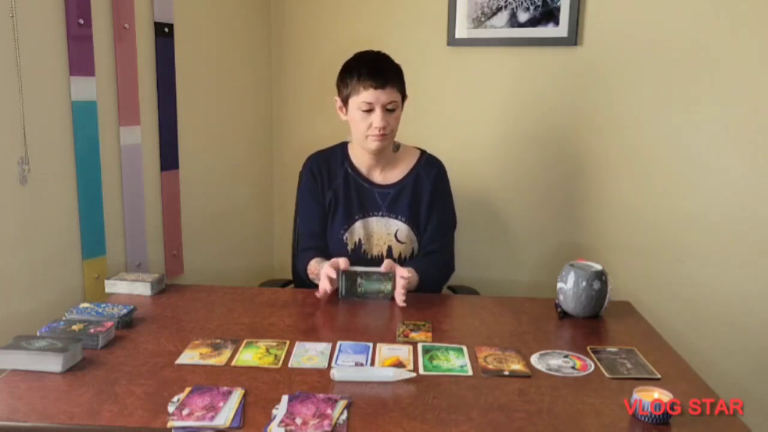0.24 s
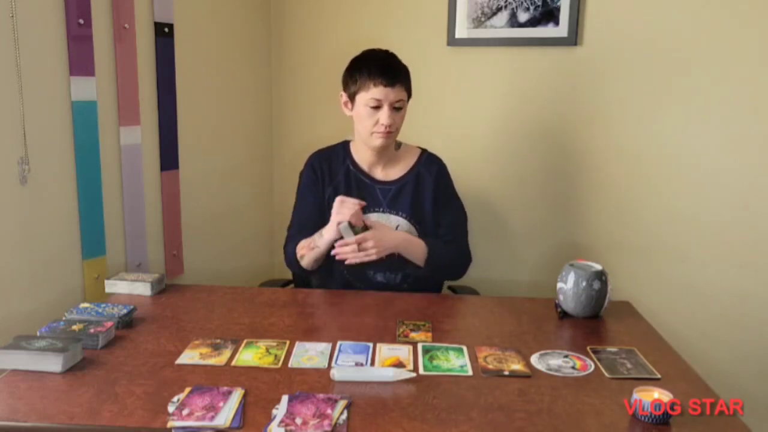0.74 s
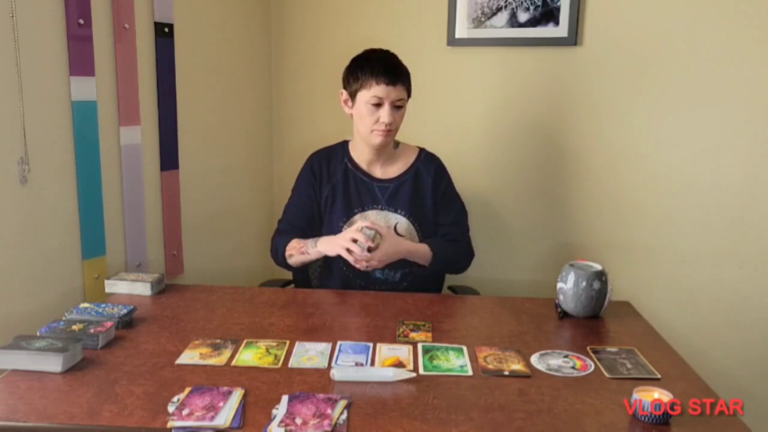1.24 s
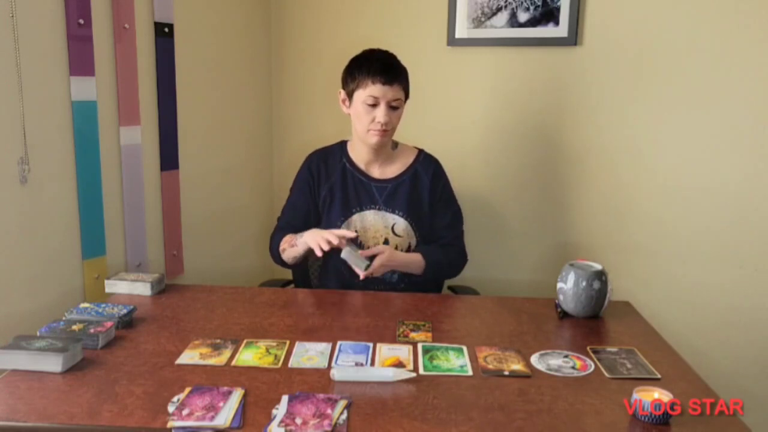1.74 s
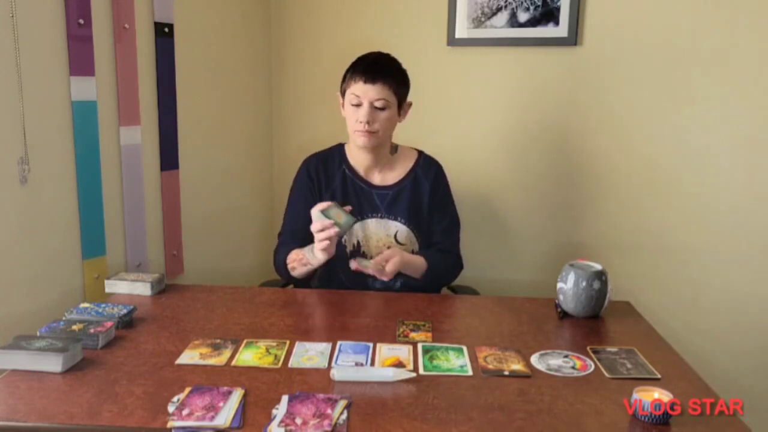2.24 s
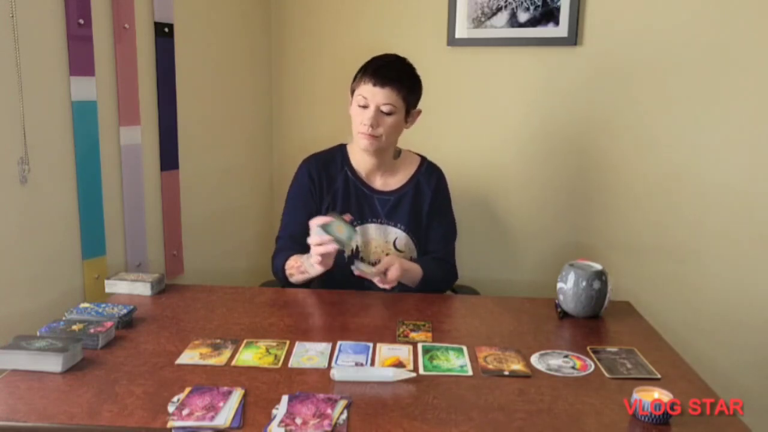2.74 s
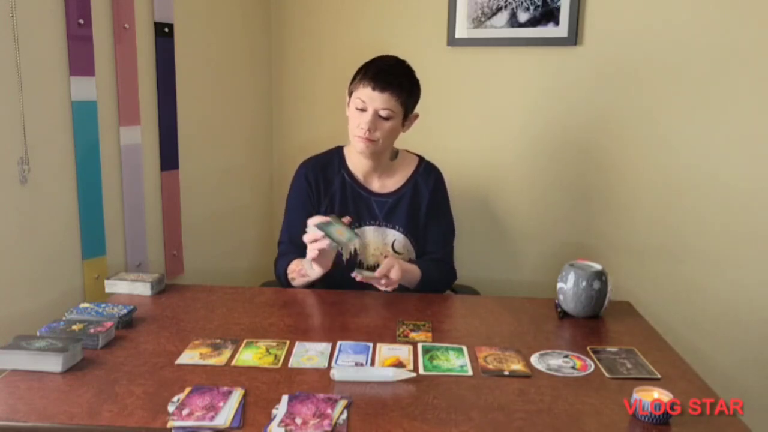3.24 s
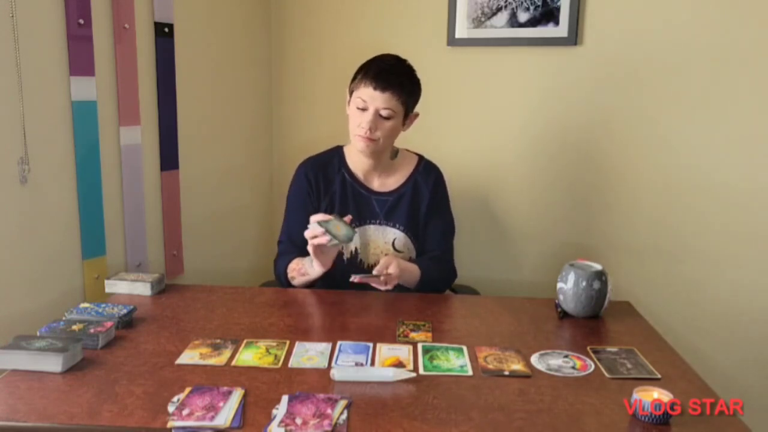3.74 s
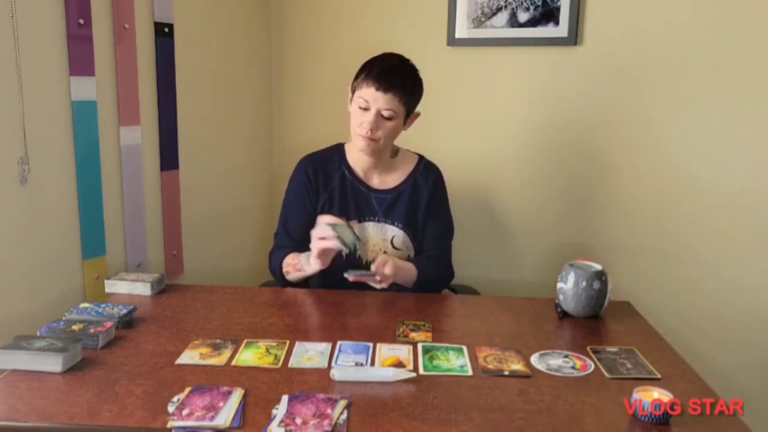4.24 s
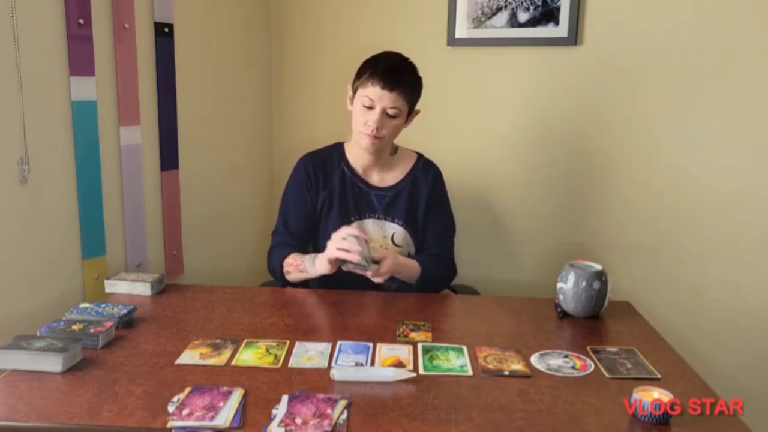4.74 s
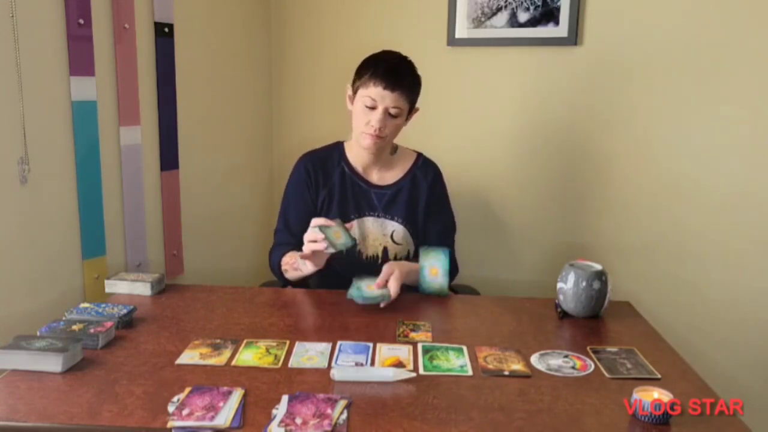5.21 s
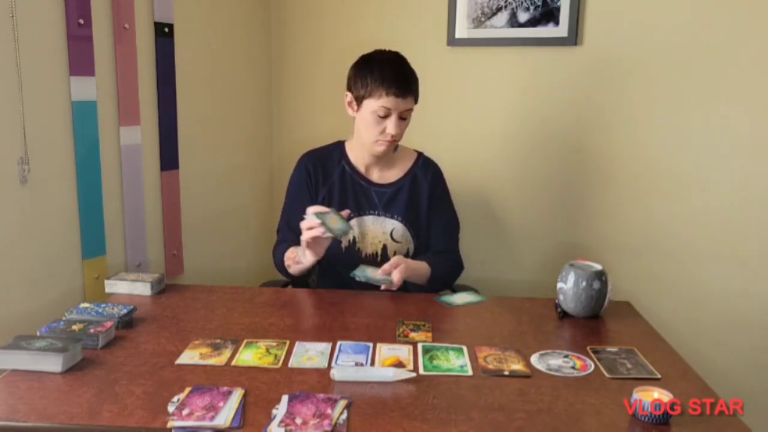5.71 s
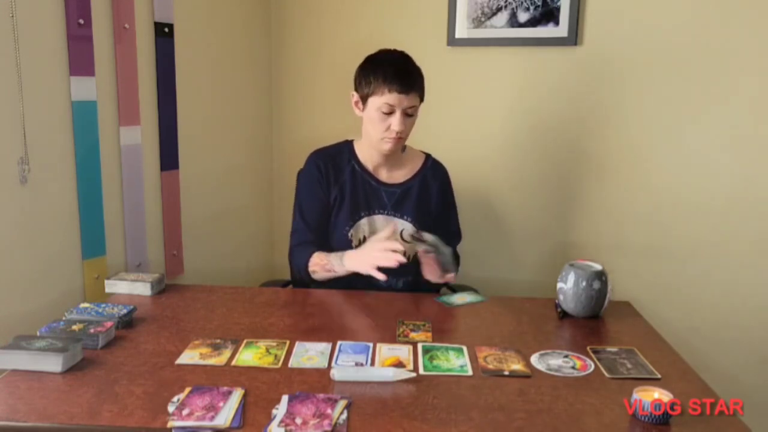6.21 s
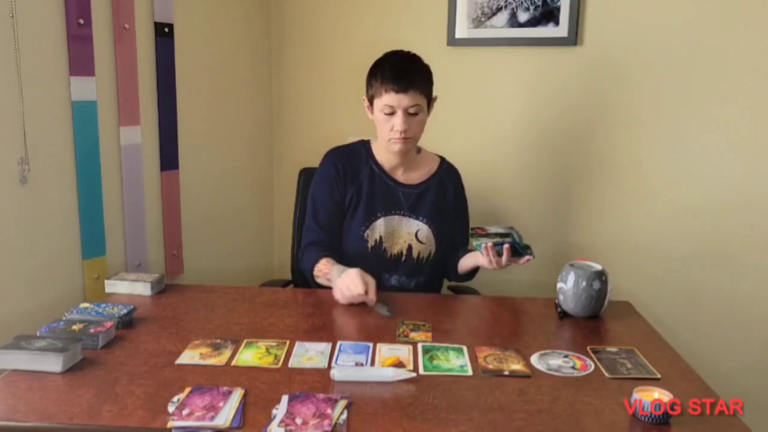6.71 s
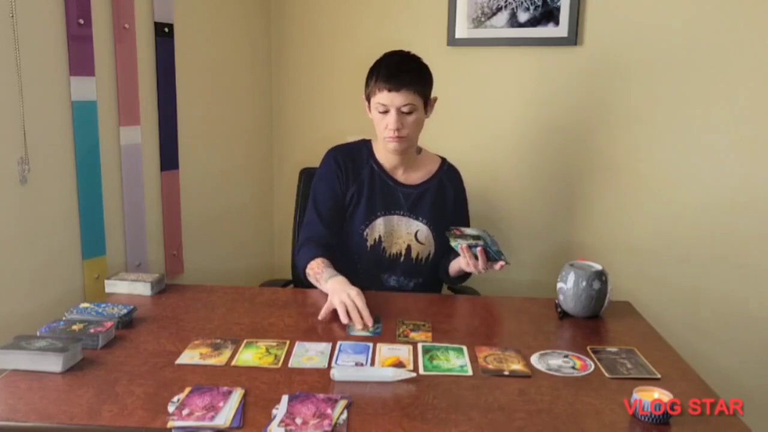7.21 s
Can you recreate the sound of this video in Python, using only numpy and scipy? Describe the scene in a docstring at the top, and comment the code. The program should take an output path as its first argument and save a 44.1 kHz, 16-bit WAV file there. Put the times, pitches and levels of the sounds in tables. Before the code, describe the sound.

A deck of cards is handled at a wooden table in a small, bare, slightly ringing room, over very soft air noise and faint low hum. From 0.1 to 0.2 s there are light knocks and a dull scrape; hard, bright knocks square the deck at 0.36 and 0.62 s, with a softer one at 0.8 s. It is then almost silent, apart from a faint touch near 1.9 s. Dull touches at 2.65 s lead into overhand shuffling from 2.8 to 5.1 s, about four strokes a second: a tap, then a brief papery slide ending in a slap, becoming crisper. At 5.2 to 5.45 s the rhythm breaks into a bunched clatter and slide. A stray card clacks on the table at 5.65 s. Weak touches follow near 5.9 and 6.35 s, a quiet hollow woody set-down at 6.93 s, and a fuller card slap around 7.15 s with small trailing taps.

```python
"""Shuffling a deck of cards

A deck is knocked square on a wooden table, then shuffled overhand about four strokes a second.
In most strokes the deck taps the pile, then a packet slides off it and slaps down. Later a card falls on
the table and is set down. Contacts are bursts of tiny clicks sent through resonant filters; slides are
swelling streams of clicks. A small bare room rings after every contact, over soft air noise and a faint hum.
"""
import sys
import numpy as np
from scipy import signal
from scipy.fft import rfft, irfft
from scipy.io import wavfile

SR = 44100
rng = np.random.default_rng(int(sys.argv[2]) if len(sys.argv) > 2 else 0)


def output_pcm(signal):
    """Save a mono or channel-first signal as 16-bit PCM at the path in sys.argv[1].

    Samples are clipped to [-1, 1] before scaling.
    """
    pcm = np.clip(np.atleast_2d(signal).T, -1, 1) * 32767
    wavfile.write(sys.argv[1], SR, np.round(pcm).astype(np.int16))


N = 328986  # length in samples, about 7.5 s

# Contact and rubbing levels, here and below, are relative: the room adds its own gain.
# Still air, the shape of its noise: pitch_hz, relative_level_db
AIR_COLOUR = [(25, -11.5), (55, 0), (120, -6), (170, -8.5), (400, -12.5), (800, -21.5), (2000, -38.5),
              (3100, -39), (6500, -42.5), (10000, -47), (15000, -46.5)]
AIR_LEVEL_DB = -68
# Hum of the appliance: pitch_hz, rms_level_db
HUM_TONES = [(59.3, -67), (100.5, -72.5), (119, -71), (177.6, -80.5), (414.5, -85)]
# How alike left and right are in diffuse sound: pitch_hz, likeness (-1 opposite, 1 the same)
STEREO_LIKENESS = [(120, 0.67), (250, 0.7), (500, 0.039), (1000, -0.34), (2200, -0.1), (5000, -.15)]

# Fingers rubbing on the deck: time_s, level_db
RUSTLE_LEVEL = [(0, -70), (.85, -71), (1.25, -82), (1.7, -86.5), (2.5, -84.5), (3.1, -72), (4.2, -64),
                (5.4, -59), (6.0, -89.5), (6.799, -87.5), (7.4, -70)]

# Tone of cards meeting cards: pitch_hz, level_db
TAP_TONE = [(60, -34.5), (130, -13.5), (220, -12.5), (330, -8), (500, -2), (800, -0.5), (1300, -1),
            (2000, -3.5), (3000, -0.5), (4300, -6), (8000, -13.5), (9500, -20.5), (14500, -22.5)]
# Further contacts of card on card: single touches, and the taps and drops of the last strokes:
# contact_s, energy_db, edge_scatter_s, treble_db, hand_hollow_hz
FURTHER_CONTACTS = [(.001, -14.5, .0054, -17, 900), (1.3265, -41, .004, 15, 1500),
                    (1.896, -25, .005, 2, 3100), (2.655, -6.5, .0052, -23, 1050),
                    (2.8158, -10, .001, 0, 1220), (3.133, -17.5, .006, 2, 830),
                    (5.201, -10, .004, 4.5, 1080), (5.333, -4.5, .0016, 2, 1290),
                    (5.404, -1, .0063, -2, 1020), (5.431, -2.5, .004, -9, 920),
                    (5.648, -10, .0025, 1, 1360), (5.883, -13, .0023, 2, 900), (6.326, -17, .009, 2, 2840),
                    (6.351, -15.5, .0054, -12, 1650), (7.043, -20, .01, -3, 2630),
                    (7.151, -5, .0027, 10, 1240), (7.156, 3, .008, -3, 1500), (7.238, -9, .0015, -1, 1250),
                    (7.391, -26.5, .0036, 4, 1120)]
# Resonance of the hollow under the hands, for a tap with no treble change
HAND_RING_DB = 5

# Tone of cards striking the table: pitch_hz, level_db
KNOCK_TONE = [(60, -28), (130, -21), (200, -14.5), (320, -13), (520, -11), (800, -5.5), (1300, -1.5),
              (2000, -1.5), (3200, -1.5), (4300, -6.5), (6500, -28), (10000, -49.5), (14500, -54)]
# Resonances in every knock: a low room mode, the table top, the deck: pitch_hz, width_hz, height_db
KNOCK_RESONANCES = [(196, 26, 14.5), (504, 70, 10), (3120, 520, 2)]
# The deck is knocked square:
# contact_s, energy_db, edge_scatter_s, bass_db, treble_db, resonance_hz, resonance_height_db
SQUARING_KNOCKS = [(.1225, -5.5, .0003, -2.5, -12, 3324, 7), (.156, -10, .0037, 1, -3.5, 1550, 6.5),
                   (.1845, -2.5, .0005, -3.5, -4, 3330, 7.5), (.358, 11, .005, -7, -2.5, 2900, 2.5),
                   (.386, 6, .0007, 1, 3, 2820, 1.5), (.622, 11.5, .002, -4, -1, 2900, 6),
                   (.631, 12.5, .0015, 3, -1, 2400, 3.5), (.791, -2.5, .0007, .5, -13, 1700, 3)]
# A stray card lands edge first on the table: contact_s, energy_db, edge_scatter_s, bass_db, treble_db
FALLING_CARD = (5.6475, 9.5, .001, 1, -8)
# Resonances of the falling card: pitch_hz, width_hz, height_db
FALLING_CARD_RESONANCES = [(1310, 550, 11.5), (3400, 950, 12.5)]
# The card is set down with a hollow, woody knock: contact_s, energy_db, edge_scatter_s, bass_db, treble_db
CARD_SET_DOWN = (6.926, -14.5, .0023, 9, 2)
# Resonances of that knock: pitch_hz, width_hz, height_db
SET_DOWN_RESONANCES = [(374, 130, 18), (880, 220, 20)]

# Tone of card faces rubbing: pitch_hz, level_db
SLIDE_TONE = [(60, -38.5), (130, -16), (280, -11.5), (500, -1.5), (1000, 3.5), (2000, 1), (3000, -1),
              (4300, -5.5), (8000, -15.5), (9500, -21), (14500, -21)]
# Cards dragged over the table or the deck: fastest_s, energy_db, run_up_s, bass_db, treble_db
CARD_DRAGS = [(.188, 2, .041, 5.5, -18), (.352, -.5, .028, -8, -27), (.51, -7.5, .098, -8, -26.5),
              (2.658, -10, .03, 12, 4.5), (5.425, 6.5, .022, 2, -21.5), (5.49, -13.5, .022, 12.5, 4.5),
              (6.88, -26, .026, 3, 14), (6.93, -18.5, .035, 3, 16), (7.177, -8, .047, -8, 1),
              (7.249, -21, .054, 24, 5)]

# Overhand strokes up to the last few, a tap on the pile and then the drop of a packet:
# tap_s, tap_energy_db, tap_edge_scatter_s, hand_hollow_hz, drop_s, drop_energy_db, drop_treble_db
SHUFFLE_STROKES = [(2.835, 5, .0023, 1300, 2.939, -11, -1), (3.08, -12, .013, 900, 3.188, -7.5, 3.5),
                   (3.324, -4, .0018, 1350, 3.429, -7.5, 0), (3.566, -7.5, .0014, 1450, 3.678, -5.5, 4.5),
                   (3.811, -6.5, .0024, 1200, 3.906, -3.5, 1), (4.047, -11.5, .0042, 1370, 4.159, -1, 7.5),
                   (4.296, -10.5, .001, 1010, 4.391, -5.5, 5), (4.528, -9.5, .0016, 1300, 4.640, -3.5, 5),
                   (4.75, -7, .0035, 800, 4.869, -2, 5), (4.98, -11, .0016, 1050, 5.0956, -2.5, 7)]
# Taps of these strokes turn crisper as the shuffle gets going: time_s, treble_db
TAP_CRISPNESS = [(2.8, -6), (3.3, -3), (3.6, 3.5), (5.0, 4.5)]
# The harder such a tap, the thinner it sounds: bass at energy 0 dB, and bass lost per dB of energy
TAP_BASS_DB, TAP_THINNING = -1.5, .7
# The drop of a packet in each of these strokes
DROP_SCATTER_S, DROP_BASS_DB, DROP_HOLLOW_HZ = .0024, 1, 1400
# Slides get shorter once the hands find their pace: time_s, run_up_s
SLIDE_RUN_UPS = [(2.9, .055), (3.5, .06), (4.2, .03), (5.1, .03)]
# The slide into each of these drops; its level and treble are added to those of the drop
SLIDE_LEVEL_DB, SLIDE_BASS_DB, SLIDE_TREBLE_DB = -3, -1, 6
# A packet slides fastest this long before it lands
FALL_S = .002

# First reflections from table and walls: left_delay_s, right_delay_s, level_relative_to_direct_db
FIRST_ECHOES = [(.0007, 0.00096, -12), (.0049, 0.006, -5), (.0056, .0054, -5), (0.0085, 0.0057, -9.5)]
# Time the late room ring takes to fall by 60 dB: pitch_hz, decay_s
ROOM_DECAY = [(150, .48), (500, 0.37), (1300, 0.41), (3000, 0.35), (6000, 0.33), (12000, 0.26)]
CUTOFF_HZ = 16100


def from_db(db):
    """Turn decibels into gain."""
    return 10 ** (np.asarray(db) / 20)


def unit_energy(x):
    """Scale so that the squares sum to one."""
    return x / np.sqrt(np.sum(x ** 2, axis=-1, keepdims=True) + 1e-20)


def at_hz(points, hz):
    """Read a table between its points, along a log-frequency axis."""
    table = np.array(points)
    return np.interp(np.log(np.maximum(hz, 1)), np.log(table[:, 0]), table[:, 1])


def at_time(points, s):
    """Read a table between its points, along a time axis."""
    return np.interp(s, *np.transpose(points))


def diffuse(size):
    """Frequencies and stereo spectrum of white noise that arrives from all sides."""
    hz = np.fft.rfftfreq(size, 1 / SR)
    alike = np.clip(at_hz(STEREO_LIKENESS, hz), -1, 1)
    mid, side = rfft(rng.standard_normal((2, size)))
    shared = np.sqrt((1 + alike) / 2) * mid
    opposed = np.sqrt((1 - alike) / 2) * side
    return hz, shared + opposed * [[1], [-1]]


def background(waver):
    """Soft coloured air noise, and hum tones whose phase wanders (waver in radians per root second)."""
    hz, noise = diffuse(N)
    air = unit_energy(irfft(noise * from_db(at_hz(AIR_COLOUR, hz)), N)) * np.sqrt(N)
    t, hum = np.arange(N) / SR, 0
    for pitch_hz, rms_db in HUM_TONES:
        wander = waver * np.cumsum(rng.standard_normal(N)) / np.sqrt(SR)
        phase = 2 * np.pi * (pitch_hz * t + rng.random()) + wander
        hum = hum + np.sqrt(2) * from_db(rms_db) * np.sin(phase)
    return from_db(AIR_LEVEL_DB) * air + hum


def grains(size, per_s, spread_db):
    """Random tiny clicks of uneven strength."""
    present = rng.random(size) < per_s / SR
    return present * rng.standard_normal(size) * from_db(spread_db * rng.standard_normal(size))


def body(colour, bass_db, treble_db, modes, size=4096):
    """How a contact rings after one click: its tone, bass and treble tilts, and resonances."""
    hz = np.fft.rfftfreq(size, 1 / SR)
    tilt_db = at_hz([(400, bass_db), (1000, 0), (2000, 0), (9000, treble_db)], hz)
    db = at_hz(colour, hz) + tilt_db
    for centre_hz, width_hz, height_db in modes:
        db = db + height_db / (1 + (2 * (hz - centre_hz) / width_hz) ** 2)
    # minimum phase: nothing rings before the blow
    cepstrum = irfft(np.log(from_db(db)))
    cepstrum[1:size // 2] *= 2
    cepstrum[size // 2 + 1:] = 0
    return irfft(np.exp(rfft(cepstrum)))


def rustle(ticks_per_s, bass_db, treble_db):
    """Fingers working the deck make sparse small ticks that grow and fade."""
    ticks = unit_energy(grains(N, ticks_per_s, spread_db=2.0)) * np.sqrt(N)
    grip = from_db(at_time(RUSTLE_LEVEL, np.arange(N) / SR))
    response = unit_energy(body(TAP_TONE, bass_db, treble_db, []))
    yield 0, signal.oaconvolve(grip * ticks, response)


def blow(s, db, scatter, response, clean_s, lead_s, edges_per_s=7000, size=4096):
    """A corner brushes first, the packet lands, stray cards follow in a dying cluster: (start, sound)."""
    t = (np.arange(size) - size // 4) / SR
    # a square packet lands mostly as one click; a ragged one is mostly cluster and starts softly
    click_share = np.exp(-scatter / clean_s)
    fade = np.exp(-np.maximum(-t / (lead_s + scatter / 8), t / (2 * scatter)))
    cluster = unit_energy(grains(size, edges_per_s, spread_db=1.5) * fade)
    landing = t == 0
    clicks = unit_energy(np.sqrt(1 - click_share) * cluster + np.sqrt(click_share) * landing)
    return s + t[0], from_db(db) * signal.fftconvolve(clicks, response)


def hand_tap(s, db, scatter, bass_db, treble_db, hollow_hz, ring_q=3.2):
    """Cards meet in the hand; a duller tap is cushioned by the palm and sounds more hollow."""
    hollow = (hollow_hz, hollow_hz / ring_q, HAND_RING_DB - .25 * treble_db)
    response = body(TAP_TONE, bass_db, treble_db, [hollow])
    return blow(s, db, scatter, response, clean_s=.001, lead_s=.0006, edges_per_s=5000)


def taps():
    """Cards meet cards: the tap and drop of each listed stroke, then the further contacts."""
    for tap_s, tap_db, scatter, hollow_hz, drop_s, drop_db, drop_treble_db in SHUFFLE_STROKES:
        tap_bass_db = TAP_BASS_DB - TAP_THINNING * tap_db
        tap_treble_db = at_time(TAP_CRISPNESS, tap_s)
        yield hand_tap(tap_s, tap_db, scatter, tap_bass_db, tap_treble_db, hollow_hz)
        yield hand_tap(drop_s, drop_db, DROP_SCATTER_S, DROP_BASS_DB, drop_treble_db, DROP_HOLLOW_HZ)
    for s, db, scatter, treble_db, hollow_hz in FURTHER_CONTACTS:
        yield hand_tap(s, db, scatter, 0, treble_db, hollow_hz)


def table_knock(s, db, scatter, bass_db, treble_db, modes):
    """Cards strike the table top and set it, and a low mode of the room, ringing."""
    response = body(KNOCK_TONE, bass_db, treble_db, KNOCK_RESONANCES + modes)
    return blow(s, db, scatter, response, clean_s=.0015, lead_s=.0002)


def knocks(ring_q):
    """The deck is knocked square, a card falls on the table and is later set down: all ring the wood."""
    for *contact, hz, ring_db in SQUARING_KNOCKS:
        yield table_knock(*contact, [(hz, hz / ring_q, ring_db)])
    yield table_knock(*FALLING_CARD, FALLING_CARD_RESONANCES)
    yield table_knock(*CARD_SET_DOWN, SET_DOWN_RESONANCES)


def slide(s, db, run_up, bass_db, treble_db, stop_s=.018, catches_per_s=5000, size=16384):
    """Card faces catch and slip, louder as they speed up, until they are stopped: (start, sound)."""
    t = (np.arange(size) - size // 2) / SR
    # run_up and stop_s are the times for a 20 dB rise and fall
    speed = from_db(-20 * np.maximum(-t / run_up, t / stop_s))
    friction = unit_energy(speed * grains(size, catches_per_s, spread_db=5))
    response = body(SLIDE_TONE, bass_db, treble_db, [])
    return s + t[0], from_db(db) * signal.fftconvolve(friction, response)


def rubbing():
    """Friction: packets of the listed strokes slide off the deck, cards are dragged, fingers rustle."""
    for *_, drop_s, drop_db, drop_treble_db in SHUFFLE_STROKES:
        run_up = at_time(SLIDE_RUN_UPS, drop_s)
        level_db, treble_db = drop_db + SLIDE_LEVEL_DB, drop_treble_db + SLIDE_TREBLE_DB
        yield slide(drop_s - FALL_S, level_db, run_up, SLIDE_BASS_DB, treble_db)
    for drag in CARD_DRAGS:
        yield slide(*drag)
    yield from rustle(ticks_per_s=1100, bass_db=-1.5, treble_db=-4.5)


def room_tail(build_s, early_db, early_s, size=32768, count=16):
    """Room ring from all sides: noise in bands that builds up, gets an early boost and dies away."""
    hz, noise = diffuse(size)
    t, tail = np.arange(size) / SR, 0
    centres = np.geomspace(130, 13000, count)
    shape = (1 - np.exp(-t / build_s)) * (1 + from_db(early_db) * np.exp(-t / early_s))
    for centre_hz, pick in zip(centres, np.eye(count)):
        weight = np.interp(hz, centres, pick)
        decay = np.exp(-np.log(1000) * t / at_hz(ROOM_DECAY, centre_hz))
        band = irfft(noise * weight) * shape * decay
        # each band keeps its share of energy, so the whole tail is about evenly coloured
        tail = tail + unit_energy(band) * np.sqrt(np.mean(weight ** 2))
    return tail


def room_response(direct_db, wet_db):
    """Direct sound, first reflections and reverberation from one place in the room."""
    response = from_db(wet_db) * room_tail(build_s=.003, early_db=3, early_s=.03)
    response[:, 0] += from_db(direct_db)
    for left_s, right_s, db in FIRST_ECHOES:
        response[[0, 1], [round(left_s * SR), round(right_s * SR)]] += from_db(direct_db + db)
    return response


def add(track, s, sound):
    """Mix a stereo sound into a track from time s on."""
    start = round(s * SR)
    part = sound[:, max(-start, 0):max(N - start, 0)]
    track[:, max(start, 0):max(start, 0) + part.shape[1]] += part


def room(sounds, direct_db, wet_db, pan_db, count):
    """The hands move, so successive sounds take turns with a few room rings; pan_db is left over right."""
    places = [room_response(direct_db, wet_db) for _ in range(count)]
    track = np.zeros((2, N))
    for k, (s, sound) in enumerate(sounds):
        add(track, s, signal.fftconvolve(sound[None], places[k % count], axes=1))
    return track * from_db([[pan_db / 2], [-pan_db / 2]])


def scene():
    """Table knocks, taps and rubbing ring in the room, over the background."""
    return (room(knocks(ring_q=2.2), direct_db=-5.0, wet_db=5, pan_db=-.96, count=4)
            + room(taps(), direct_db=-2.8, wet_db=3.0, pan_db=0.0, count=7)
            + room(rubbing(), direct_db=-6, wet_db=0.0, pan_db=-.8, count=2)
            + background(waver=1.0))


def record(dry):
    """A steep low-pass filter removes the very top of the treble."""
    low_pass = signal.ellip(10, .2, 70, CUTOFF_HZ, fs=SR, output="sos")
    return signal.sosfilt(low_pass, dry)


dry = scene()
out = record(dry)
output_pcm(out)
```